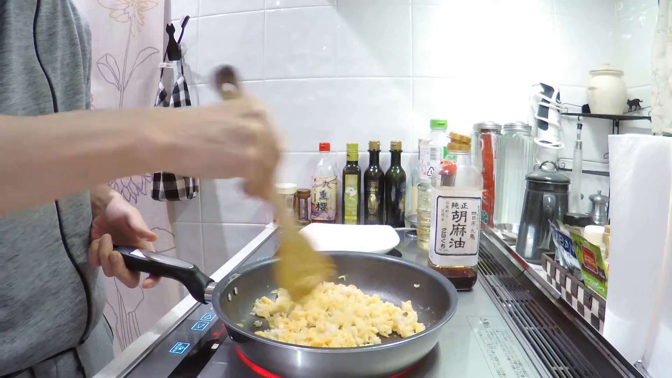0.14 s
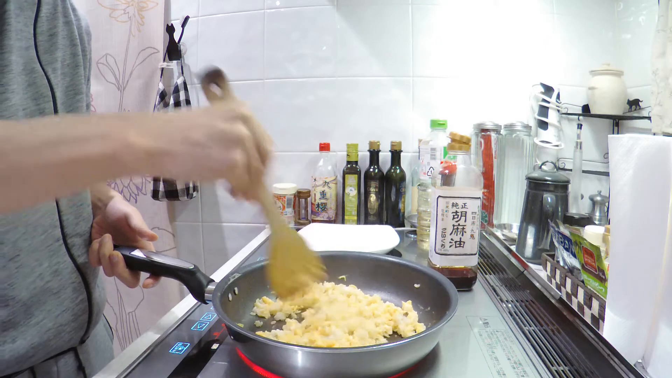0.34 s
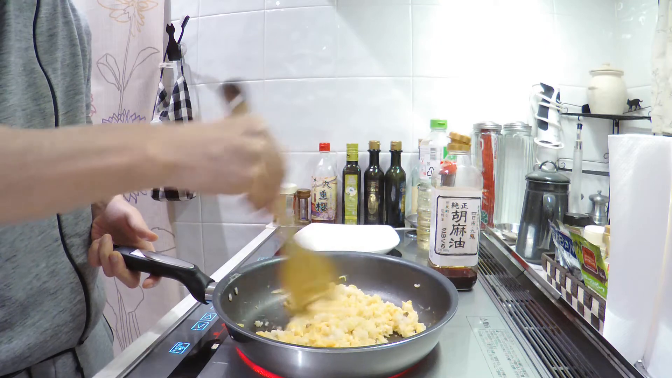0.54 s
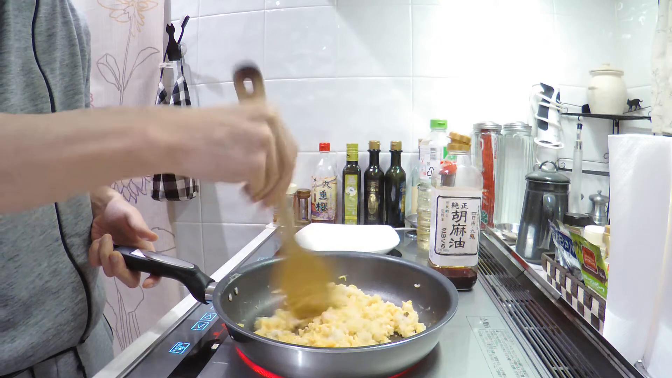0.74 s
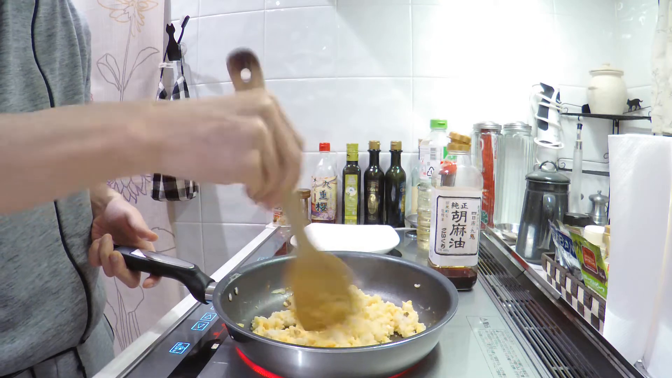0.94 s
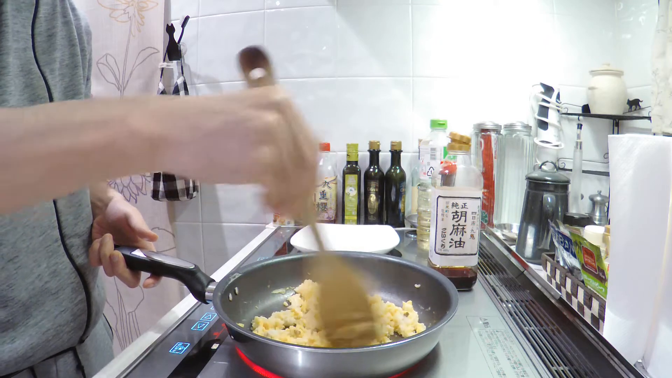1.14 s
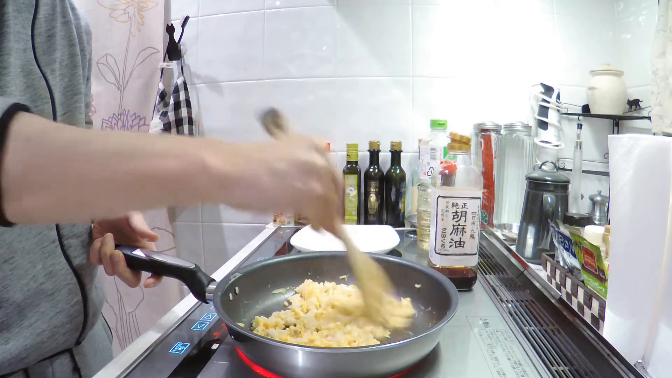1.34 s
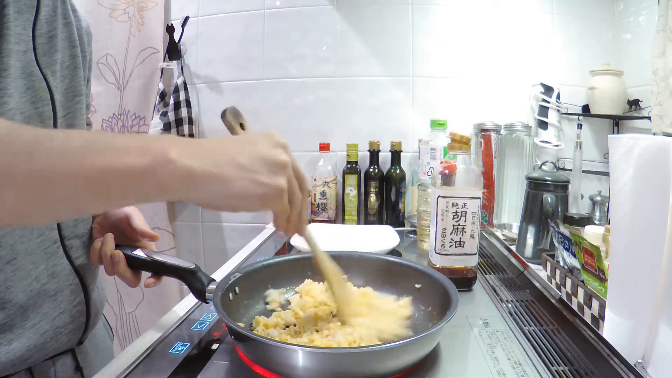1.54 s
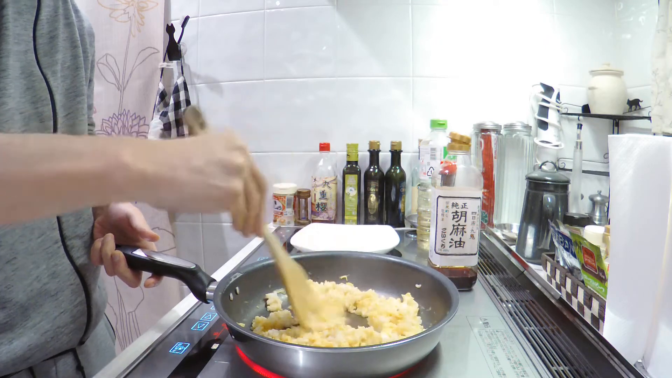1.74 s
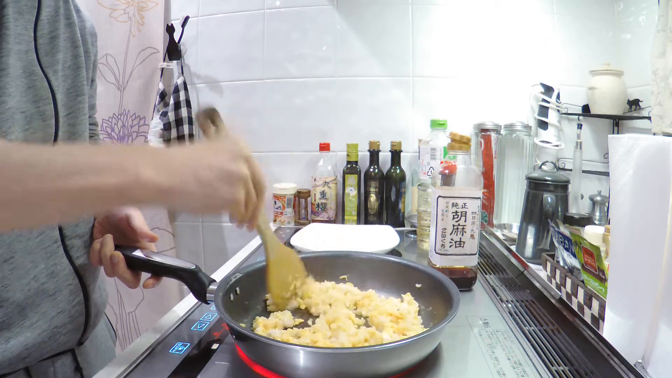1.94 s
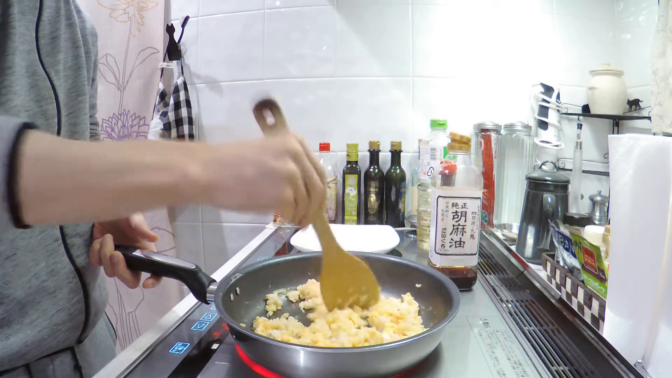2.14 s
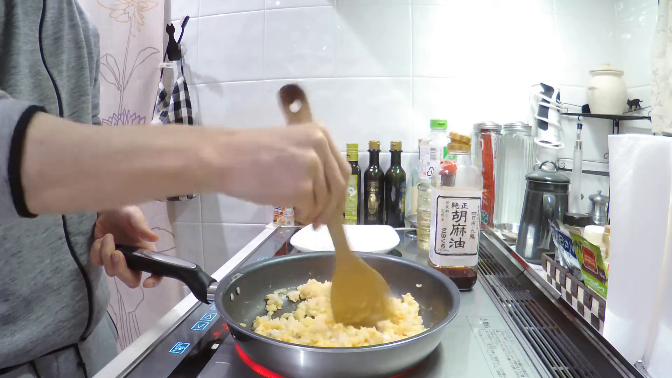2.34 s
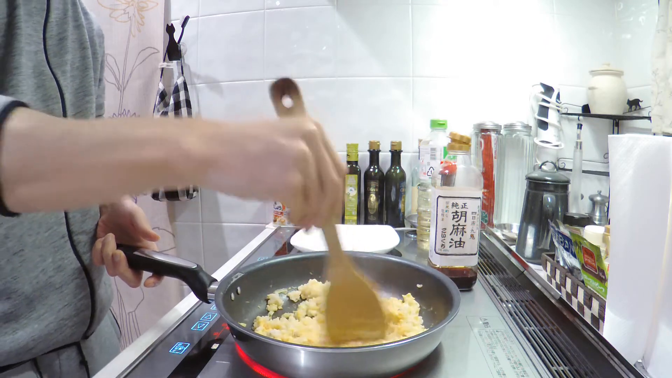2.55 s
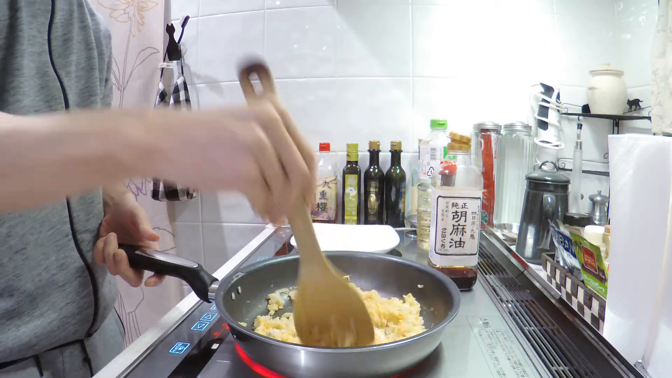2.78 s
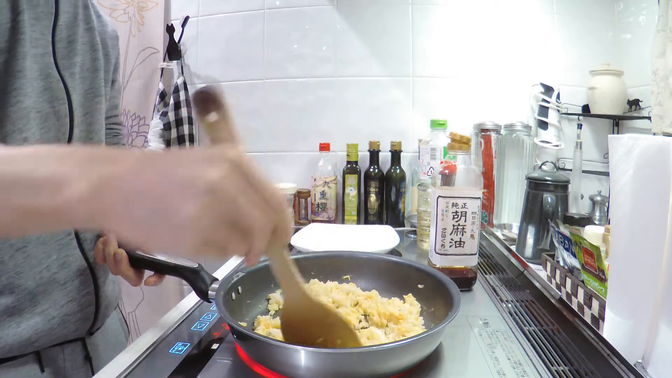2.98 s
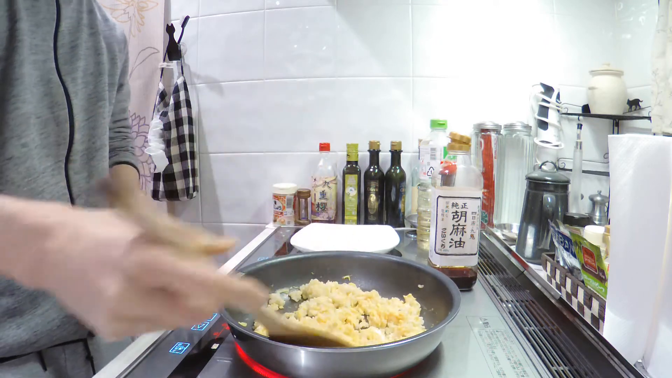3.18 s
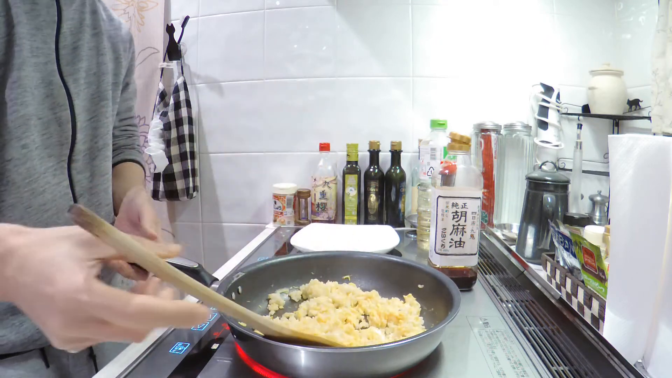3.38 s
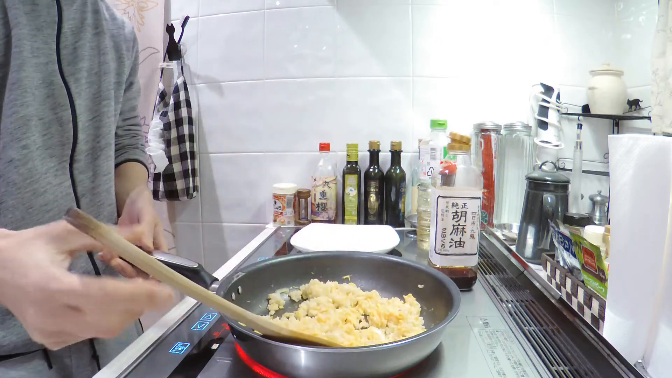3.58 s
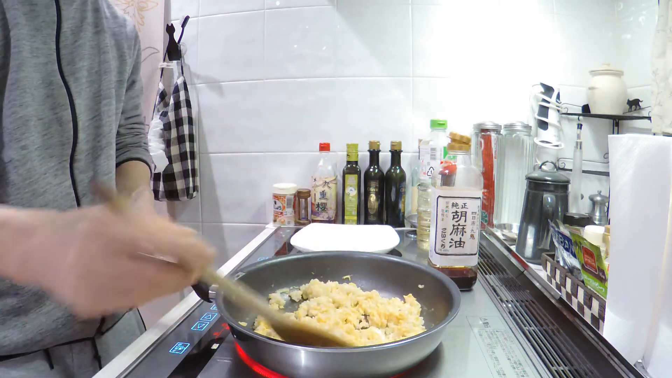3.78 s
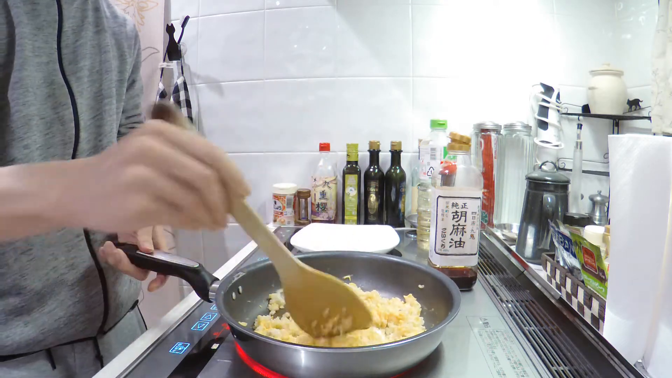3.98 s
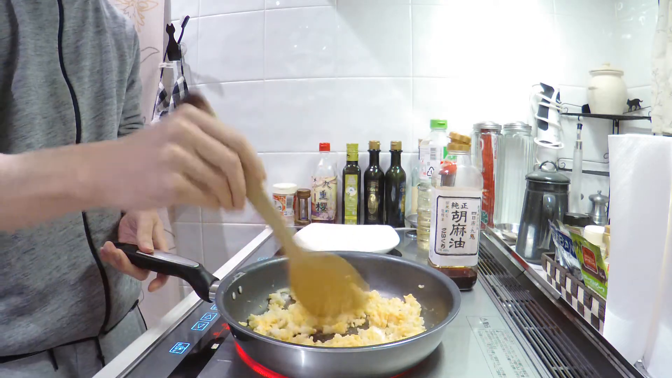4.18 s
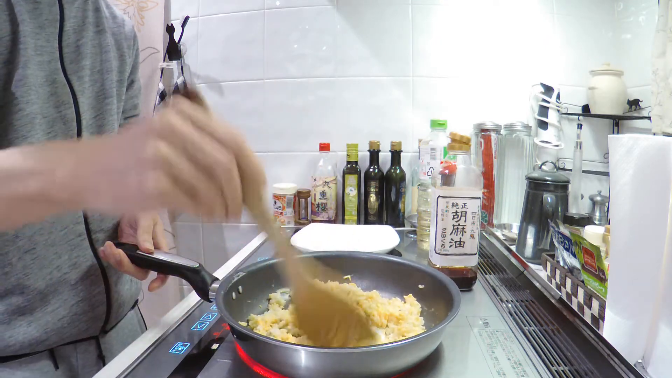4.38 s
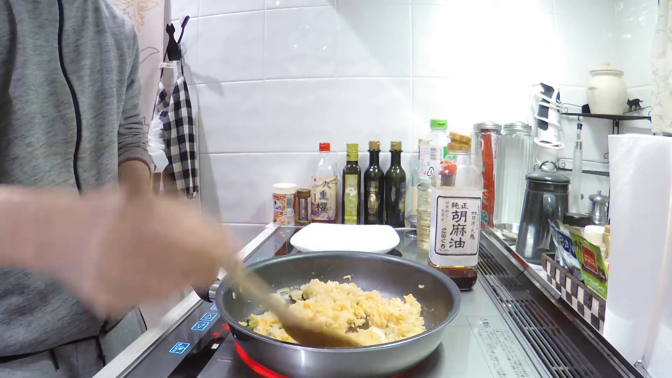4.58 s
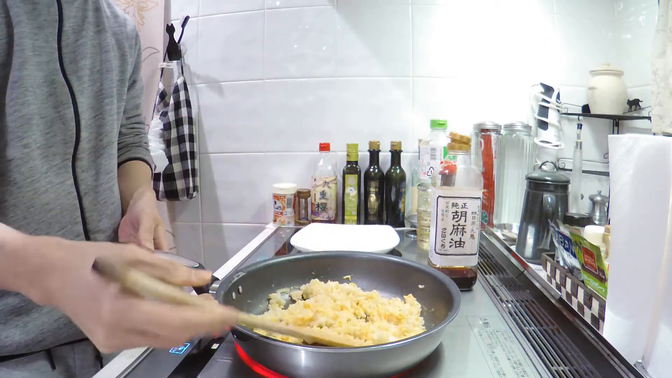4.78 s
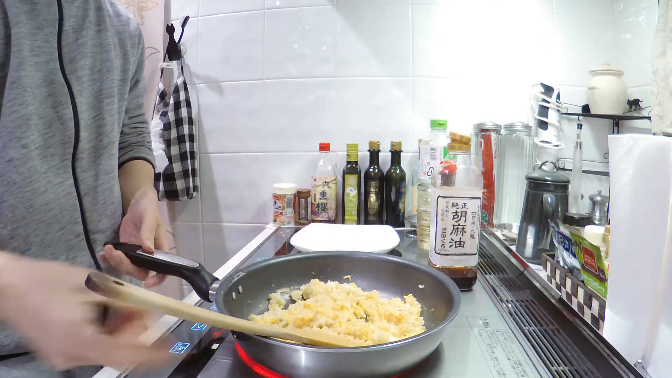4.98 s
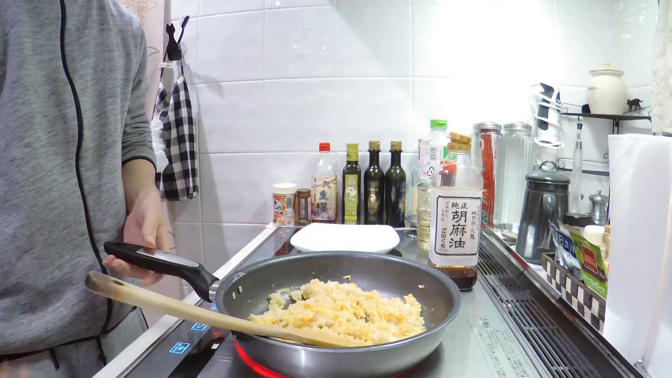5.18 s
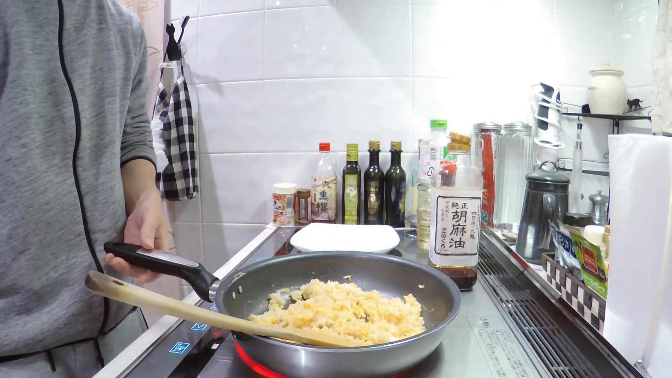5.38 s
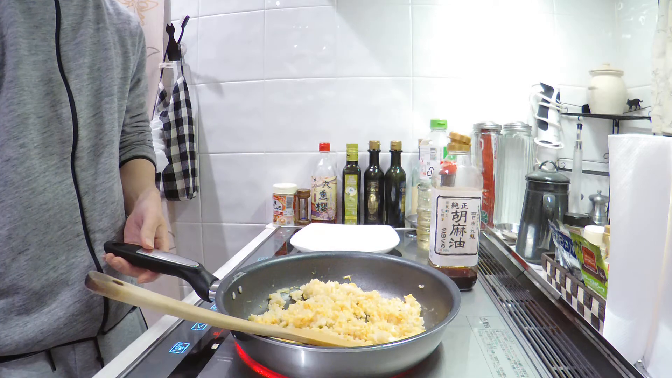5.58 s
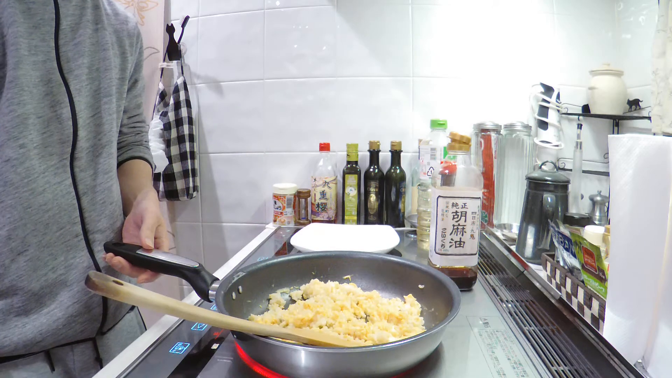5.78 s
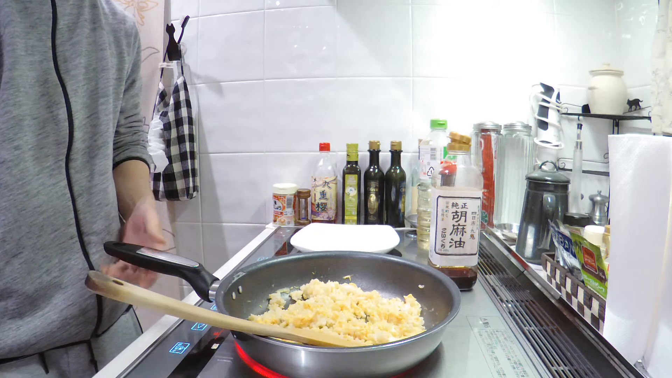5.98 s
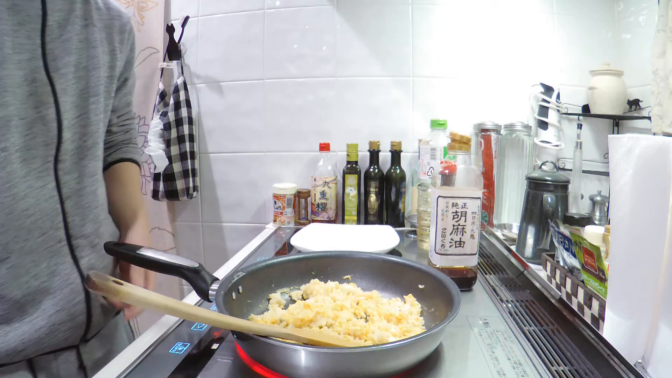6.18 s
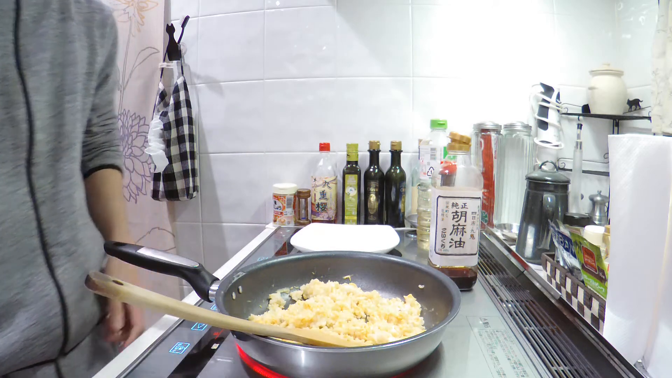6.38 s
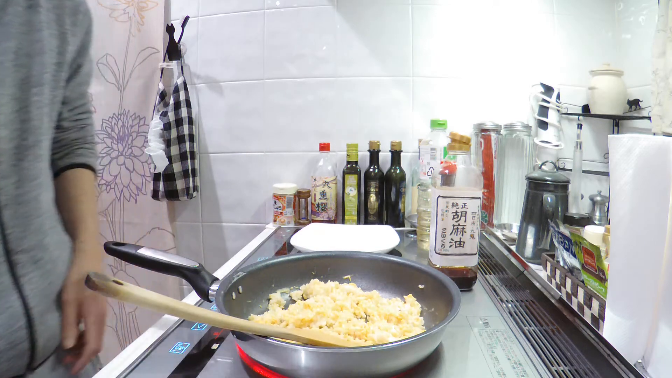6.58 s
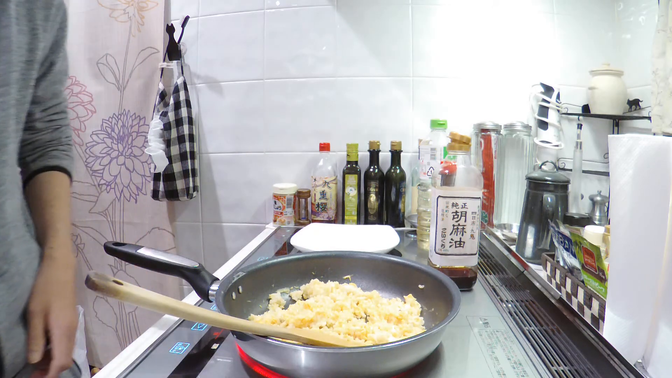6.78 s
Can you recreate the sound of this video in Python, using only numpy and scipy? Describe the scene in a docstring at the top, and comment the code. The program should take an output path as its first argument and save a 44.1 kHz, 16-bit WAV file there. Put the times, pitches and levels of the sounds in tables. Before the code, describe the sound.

A close stereo pickup in a small tiled kitchen. Throughout, a bright, fine oil fizz and lower wet rice crackle flutter and surge, over low room air and a faint high hob buzz. From 0.2 to 3.2 seconds a wooden spatula chops against a metal pan about every 0.2 seconds: dry woody knocks with short damped pan clonks, low counter thumps and quick wall reflections. Blows vary; those near 1.0, 1.95 and 2.35 are strong, others are soft taps. The chopping pauses after 3.2, with small spits around 3.5 and 3.8 and a faint scrape near 4.0. Two hard knocks land at 4.2 and 4.4, the first loudest. At 4.84 the handle clacks lightly on the rim with a brief metallic ting. Then the sizzle continues alone, slightly thinner, with scattered spits, tiny scrapes from 5.8 to 6.1, sharper spits near 6.6 and a barely audible tap at 6.8.

```python
"""A small tiled kitchen, where egg and rice fry in a metal pan on an induction hob.
A wooden spatula chops through the rice and hits the pan: noise makes its crack, fading sine waves make
the knock, the pan's ring and the counter's thump. The spatula is laid on the rim, and a deep sway follows the thumps.
Random clicks make the oil's fizz and the rice's crackle, which surge at knocks and falling clumps.
Noise bursts make spits and pops, runs of clicks make scrapes, sines a faint hob buzz, steady noise the air."""
import sys
import numpy as np
from scipy import signal
from scipy.fft import rfft, irfft, next_fast_len
from scipy.io import wavfile
from scipy.ndimage import uniform_filter1d

SR = 44100
rng = np.random.default_rng(int(sys.argv[2]) if len(sys.argv) > 2 else 0)


def put_to_file(sound):
    """Save the sound as 16-bit audio at rate SR, in the file named by the first command-line argument."""
    columns = np.atleast_2d(sound).T  # one column per channel
    safe = np.clip(columns, -1, 1)
    whole_steps = np.round(safe * 32767)
    wavfile.write(sys.argv[1], SR, whole_steps.astype(np.int16))


N = 301203
TIME = np.arange(N) / SR  # seconds

# The spatula meets the pan. Each row: start in seconds, blow level in dB, then three levels in dB relative
# to the blow (counter thump, wood crack, weight of the pan wall's ring), then the pitch of the blade's knock
# in Hz and the pitch favoured by the struck spot in Hz.
KNOCKS = [(0.221, -14, -14, -19, -4, 1097, 605), (0.433, -23.5, -15.5, -8, -23, 806, 505),
          (0.669, -25.5, -7, -25, -25, 1190, 610), (0.852, -19.5, -5.5, -19, -9, 1190, 592),
          (1.028, -8.5, -10.5, -21.5, -4.5, 1140, 479), (1.264, -23.5, -0.5, -18.5, -6.5, 740, 480),
          (1.521, -36.5, 3, -12, -20, 750, 442), (1.721, -17.5, -7.5, -19.5, 0.5, 1080, 610),
          (1.952, -7, -14.5, -18.5, 0, 1110, 363), (2.155, -16.5, -10.5, -25.5, -11.5, 876, 474),
          (2.34, -7, -14, -17, -4.5, 1197, 460), (2.538, -24.5, -3, -17, -5, 1150, 510),
          (2.72, -42, 13.5, -18, -19, 1120, 480), (2.926, -12, -4, -10, -2.5, 1127, 484),
          (3.204, -39.5, 2, -19, -4, 766, 482), (4.059, -45.5, 12.5, -23, -16, 746, 600),
          (4.22, -1, -16.5, -21, -7, 1190, 587), (4.416, -7.5, -10.5, -20, -6.5, 1130, 480),
          (4.837, -25, -1, -9.5, 3, 805, 482), (6.799, -55, 6.5, -10.5, -9, 1010, 500)]
# The counter and what stands on it. Each row: pitch in Hz, relative level in dB, time to fade by 60 dB in
# seconds, left-right phase difference in half turns.
COUNTER_MODES = [(62.6, -14.5, 0.21, 0.73), (103.5, -7.5, 0.35, 0.95), (132.2, -12, 0.12, 0.13),
                 (158, -7.5, 0.16, 0.97), (177.9, -3, 0.086, .1), (196.1, -4, 0.13, 0.46),
                 (237.4, -6.5, 0.059, 0.93), (250.3, -4.5, 0.097, 0.85)]
# The pan, damped by the rice. Each row: pitch in Hz, relative level in dB, time to fade by 60 dB in seconds.
PAN_MODES = [(297.2, -3, 0.098), (360, 3.5, 0.062), (408, -3, 0.1), (479.3, 5.8, 0.083), (548, -4.5, 0.11),
             (586, 5, 0.06), (651.5, 2, 0.091), (715, -5.5, 0.075), (777, -8.5, 0.125), (822, -2.5, 0.058),
             (938, -6.5, 0.078), (979, -0.5, 0.053), (1039, -9.5, 0.098), (1139, -3, 0.1),
             (1196, -8, 0.074), (1255, -11.5, 0.11), (1420, -15, 0.1), (1535, -2, 0.065), (1624, 3, 0.06),
             (1731, -2, 0.11), (1773, -5.5, 0.12), (1849, 4, 0.041)]
# Tone colour of the wood's dry crack. Each row: frequency in Hz, relative level in dB.
WOOD_COLOUR = [(300, -12.5), (900, 7), (1800, 9), (2600, 2), (3200, -1), (5000, -17), (8000, -19),
               (15000, -32.5)]
# The handle rings as it is laid on the rim. Each row: pitch in Hz, level in dB, time to fade by 60 dB in seconds.
RIM_MODES = [(1584, -31.5, 0.13), (1845, -29, 0.12), (2150, -39, 0.09), (2250, -32.5, 0.11),
             (3860, -28, 0.085), (4110, -31.5, 0.06)]
# Near walls and hob glass. Each row: delay in seconds, left gain, right gain (both before the echo level).
ECHO_PATHS = [(.0053, .42, 0.44), (.0069, .22, .38), (.0118, 0.196, .12), (.0205, .12, .16),
              (.0275, 0.3, 0.26)]
# Tone colour of the kitchen's reverberation. Each row: frequency in Hz, relative level in dB.
ROOM_COLOUR = [(80, -0.5), (300, -12.5), (600, -0.5), (1100, -6), (1750, -4.5), (2600, -11.5), (6000, -14),
               (15000, -4)]
# The larger oil spits. Each row: start in seconds, level in dB before tick, snap and puff are mixed.
SPITS = [(1.2672, -25), (3.456, -22.5), (3.5254, -30), (3.83, -30), (4.8498, -23.5), (4.8884, -31),
         (5.633, -31), (5.8138, -28), (5.8381, -31), (5.914, -29), (6.0534, -26.5), (6.162, -31),
         (6.4671, -31), (6.581, -23), (6.606, -27.5)]
# Tone colour of the oil's fizz. Each row: frequency in Hz, relative level in dB.
FIZZ_COLOUR = [(1000, -18.5), (2500, -12.5), (5000, -9), (6500, -7.5), (8400, -2.5), (10200, -5),
               (12500, -11.5), (16000, -18.5)]
# Tone colour of the wet rice's crackle. Each row: frequency in Hz, relative level in dB.
CRACKLE_COLOUR = [(300, -11.5), (700, 0.5), (1400, -11.5), (1900, -4), (2500, 0.5), (3500, 1), (5000, -1),
                  (7000, -6), (15000, -29)]
# Soft scrapes and shifts in the pan. Each row: start in seconds, length in seconds, centre in Hz, level in dB.
SCRAPES = [(3.793, 0.049, 2560, -50), (4.01, 0.13, 3000, -55), (5.781, 0.041, 885, -47.5),
           (5.835, 0.02, 3600, -41.5), (5.93, 0.043, 2600, -42.5), (6.025, 0.018, 2530, -42.5),
           (6.079, 0.016, 3200, -41)]
# Hob buzz. Each row: multiple of the magnetic pull's frequency, mean level in dB.
BUZZ = [(14, -71), (16, -76.5), (17, -87.5), (18, -65), (19, -73), (20, -70), (21, -68.5), (25, -68)]
# Tone colour of the kitchen's air. Each row: frequency in Hz, relative level in dB per Hz.
AIR_COLOUR = [(12, -16.5), (20, 9.5), (76, -11.5), (156, -6), (307, -17), (500, -11), (931, -32.5),
              (1210, -16), (1460, -36), (1640, -20), (1800, -47.5), (2340, -49), (3960, -120)]
# A clump of wet rice falls onto hot metal and the sizzle surges. Each row: time of the top in seconds,
# width in seconds, rise of the fizz in dB.
SURGES = [(0.212, 0.012, 7.5), (.51, 0.026, 5), (1.389, 0.046, 7), (2.35, 0.018, 6), (2.53, 0.038, 4.5),
          (2.96, 0.025, 5), (4.06, 0.049, 8), (4.63, 0.03, 6.5), (5.75, 0.033, 6), (6.176, 0.012, 6.5)]

RIM_S = 4.838  # when the handle is laid on the rim, seconds
# the dull clonk of the pan bottom grows more slowly than the blow, so hard blows sound brighter
CLONK_DB, CLONK_DB_PER_DB = -17.7, -0.51  # weight of the low modes relative to the blow, at a blow of 0 dB
RING_DB = -8.5  # the whole pan ring, on top of its weights
SPIT_HZ, SNAP_DB = 9300, -18  # pitch of a spit's tick; weight of its low snap before the mix
# fizz and crackle start at a level in dB and ease off, in dB per second, as the food dries
FIZZ_DB, FIZZ_DB_PER_S = -46.8, -0.25
CRACKLE_DB, CRACKLE_DB_PER_S = -53, -0.04
# each knock presses fresh rice onto the metal: the sizzle steps up and sinks back
PRESS_DB, PRESS_ATTACK_S, PRESS_T60_S = 2.3, 0.008, 1.3
PULL_HZ, SUNG_MULTIPLE = 120, 17
# the pan sings on one multiple while it is pressed down, and falls quiet as the hand eases
SING_DB, PRESSED_UNTIL_S, SING_DB_PER_S = -56.5, 2.3, -6.5
# each thump sets off a deep sway far down in the bass; hard and soft ones differ little, and a slight tremor is
# always there
SWAY_DB, SWAY_DB_PER_DB, TREMOR_DB = -32.3, 0.17, -62  # sway after a thump of 0 dB
SWAY_ATTACK_S, SWAY_T60_S = 0.054, 1.55
AIR_DB = -54.5  # level of the air's middle signal
TOP_HZ = 16100  # highest frequency let through


def knocks():
    """Wood strikes the pan through the rice: the blade's crack and knock, the pan's short ring, the counter's thump."""
    out, t = np.zeros((2, N)), TIME[:SR // 3]
    thump = counter_thump()
    for s, db, thump_db, crack_db, wall_db, blade_hz, spot_hz in KNOCKS:
        clonk_db = CLONK_DB + CLONK_DB_PER_DB * db
        # a sharp burst of noise with a faint longer tail
        grit_fade = fade(t, 0.044) + 0.057 * fade(t, 0.41)
        grit = spread(rng.standard_normal((2, len(t))), 0.36) * grit_fade
        crack = attack_unit(colour(grit, WOOD_COLOUR))
        blade = 0.85 * fade(t, 0.025) * np.sin(2 * np.pi * blade_hz * t)
        wood = echoes(blade + undb(crack_db) * crack, echo_db=-2.8, shift=0.06)
        ring = undb(RING_DB) * pan_ring(t, clonk_db, wall_db, spot_hz, spot_db=7, scatter_db=2.5, port_phase=0.4)
        # the blade and pan sound a moment after the thump starts
        add(out, s + 0.0008, undb(db) * (wood + ring))
        add(out, s, undb(db + thump_db) * thump)
    rim = sum(undb(db) * fade(t, t60) * np.sin(2 * np.pi * hz * t) for hz, db, t60 in RIM_MODES)
    add(out, RIM_S, rim)
    return out


def pan_ring(t, clonk_db, wall_db, spot_hz, spot_db, scatter_db, port_phase):
    """Each blow lands elsewhere, so weighs the modes anew; the bottom holds the low modes, the wall the high ones."""
    hz, db, t60 = np.transpose(PAN_MODES)[:, :, None]
    level_chance, phase_chance, side_chance = rng.standard_normal((3, len(PAN_MODES), 1))
    place_db = np.select([hz < 680, hz > 1350], [clonk_db, wall_db])
    # modes near the struck spot's pitch are favoured
    place_db = place_db + spot_db * np.exp(-((hz - spot_hz) / 45) ** 2)
    sides = np.array([1, -1])[:, None, None]
    phase = 1.33 * phase_chance + port_phase * side_chance * sides
    gain = undb(db + place_db + scatter_db * level_chance)
    modes = gain * fade(t, t60) * np.sin(2 * np.pi * hz * t + phase)
    return modes.sum(axis=1) * (1 - fade(t, 0.0051))  # quick soft start


def counter_thump():
    """The stiff worktop takes a moment to get going and shakes the two sides unlike."""
    t, sides = TIME[:SR // 2], np.array([[0.5], [-0.5]])
    modes = sum(undb(db) * fade(t, t60) * np.sin(2 * np.pi * hz * t + np.pi * lag * sides)
                for hz, db, t60, lag in COUNTER_MODES)
    return attack_unit(modes * (1 - fade(t, 0.069))) * undb(2.0 * sides)


def echoes(x, echo_db, shift):
    """The tiles and the hob glass throw a knock straight back; the path lengths vary from knock to knock."""
    out = x.copy()
    for delay, left, right in ECHO_PATHS:
        lag = int(delay * np.exp(shift * rng.standard_normal()) * SR)
        out[:, lag:] += undb(echo_db) * np.array([[left], [right]]) * x[:, :-lag]
    return out


def sizzle():
    """Bright fizz of the oil and a lower crackle of wet rice surge at knocks and falling clumps, in little flurries."""
    pressed_db = PRESS_DB * sum(kicked(s, PRESS_ATTACK_S, PRESS_T60_S) for s, *_ in KNOCKS)
    surge_db = pressed_db + sum(db * swell(top, width) for top, width, db in SURGES)
    flurry = flicker(45)
    fizz = unit(colour(bursts(14000, 3.2, width=1.07), FIZZ_COLOUR))
    fizz_db = FIZZ_DB + FIZZ_DB_PER_S * TIME + surge_db + 1.6 * flurry
    crackle = unit(colour(bursts(7000, 2.36, width=0.201), CRACKLE_COLOUR))
    crackle_db = CRACKLE_DB + CRACKLE_DB_PER_S * TIME + 0.7 * surge_db
    crackle_db = crackle_db + 1.28 * flurry + 1.53 * flicker(30)  # partly its own flicker
    return fizz * undb(fizz_db) + crackle * undb(crackle_db)


def spits():
    """Single drops of water explode in the oil: a sharp tick, a lower snap and a puff of steam."""
    out, t = np.zeros((2, N)), TIME[:SR // 10]
    tick_colour = [(700, -30), (3000, -18), (0.8 * SPIT_HZ, -6), (SPIT_HZ, 0), (2 * SPIT_HZ, -9)]
    snap_colour = [(800, -18), (2300, -9), (3800, 1), (6500, -15), (15000, -26)]
    for s, db in SPITS:
        tick = spread(rng.standard_normal((2, len(t))), 0.52) * fade(t, 0.0025)
        tick = attack_unit(colour(tick, tick_colour), size=128)
        snap = spread(rng.standard_normal((2, len(t))), 0.29) * fade(t, 0.058)
        snap = attack_unit(colour(snap, snap_colour), size=256)
        puff = unit(colour(rng.standard_normal((2, len(t))), FIZZ_COLOUR)) * fade(t, 0.066)
        add(out, s, undb(db) * (0.46 * tick + 0.44 * undb(SNAP_DB) * snap + 0.31 * puff))
    return out


def crackles(rate, db):
    """Now and then a grain of rice pops on the hot metal: a very short burst of noise."""
    t = TIME[:SR // 100]
    pop = rng.standard_normal((1, len(t))) * fade(t, 0.0018)
    pops = signal.fftconvolve(bursts(rate, 2.6, width=0.74), pop, axes=1)[:, :N]
    pop_colour = [(900, -17), (3000, -2.5), (6000, -3.5), (9500, 1), (16000, -5.5)]
    return undb(db) * unit(colour(pops, pop_colour))


def scrapes():
    """Wood and grains slide over the metal in a quick run of tiny slips."""
    out, slips = np.zeros((2, N)), bursts(3000, 4.3, width=0.65)
    for s, length, hz, db in SCRAPES:
        run = slips[:, int(s * SR):int((s + length) * SR)]
        rub = unit(colour(run, [(hz / 4, -16), (hz, 0), (hz * 4, -17)]))
        add(out, s, undb(db) * rub * np.hanning(rub.shape[-1]))
    return out


def hob():
    """The coil pulls on the pan bottom twice in each mains cycle; a few high multiples sing out."""
    turn = 2 * np.pi * PULL_HZ * TIME
    buzz = sum(undb(db + 1.5 * flicker(6)) * np.sin(multiple * turn) for multiple, db in BUZZ)
    sung = np.sin(SUNG_MULTIPLE * turn)
    sung_db = SING_DB + SING_DB_PER_S * np.maximum(TIME - PRESSED_UNTIL_S, 0)
    return np.sqrt(2) * (buzz + undb(sung_db + 1.6 * flicker(30)) * sung)


def sway(hz):
    """The chopping keeps a deep sway going unevenly, far down in the bass."""
    power = undb(TREMOR_DB) ** 2
    for s, db, thump_db, *_ in KNOCKS:
        kick_db = SWAY_DB + SWAY_DB_PER_DB * (db + thump_db)
        power = power + (undb(kick_db) * kicked(s, SWAY_ATTACK_S, SWAY_T60_S)) ** 2
    # the phase wanders, and differs between left and right
    turn = 2 * np.pi * hz * TIME + 1.4 * flicker(1.9) + np.array([[0.9], [-0.9]])
    return np.sqrt(2 * power) * np.sin(turn)


def air():
    """Low steady noise of the kitchen, wide in the bass."""
    mid, side = colour(rng.standard_normal((2, N)), AIR_COLOUR)
    side_colour = [(50, 5.5), (110, 9.0), (200, 3.5), (400, -4.5), (1000, -8.0)]
    return undb(AIR_DB) * spread([mid, colour(side, side_colour)], 0.69) / np.std(mid)


def kitchen(x, tail_db, t60):
    """The small room adds a short diffuse tail, made of fading noise."""
    t = TIME[:SR // 2]
    noise = spread(rng.standard_normal((2, len(t))), 0.55)
    tail = colour(noise, ROOM_COLOUR) * fade(t, t60) * (1 - fade(t, 0.034))
    tail = unit(tail) / np.sqrt(len(t))  # total energy of 1 per side, on average
    return x + undb(tail_db) * signal.fftconvolve(x, tail, axes=1)[:, :N]


def bursts(rate, size_db, width):
    """Tiny clicks at random moments and places from left to right, most small and a few large."""
    count = int(rate * N / SR)  # rate is clicks per second
    when, chance, where = rng.random((count, 3)).T
    loudness = size_db * np.minimum(-np.log(1 - chance), 6.5)
    # half of the clicks push and half pull, in random order
    size = undb(loudness) * np.where(np.arange(count) % 2, 1, -1)
    angle = np.pi / 4 + width * (2 * where - 1)
    sample = (when * N).astype(int)
    return unit(np.array([np.bincount(sample, size * gain, N) for gain in (np.cos(angle), np.sin(angle))]))


def flicker(rate):
    """Smooth random wander scaled to rms 1, with a new random target at the given rate per second."""
    k = int(SR / rate)
    steps = np.repeat(rng.standard_normal(N // k + 1), k)
    return unit(uniform_filter1d(steps, k)[:N])


def swell(top, width):
    """A smooth rise and fall, 1 at its top."""
    return np.exp(-((TIME - top) / width) ** 2)


def kicked(start, attack, t60):
    """A quick rise at a time, then a decay."""
    age = np.maximum(TIME - start, 0)
    return (1 - np.exp(-age / attack)) * fade(age, t60)


def fade(t, t60):
    """Exponential decay that falls by 60 dB in t60 seconds."""
    return np.exp(-np.log(1000) * t / t60)


def colour(x, points):
    """Filter that follows a (Hz, dB) curve and never sounds ahead of its input."""
    size = next_fast_len(2 * x.shape[-1], True)
    size += size % 2
    hz, db = np.transpose(points)
    bin_hz = np.fft.rfftfreq(size, 1 / SR)
    log_gain = np.log(undb(np.interp(np.log(bin_hz + 1), np.log(hz), db)))
    # folding the cepstrum onto positive times gives the matching minimum phase
    cepstrum = irfft(log_gain)
    cepstrum[1:size // 2] *= 2
    cepstrum[size // 2 + 1:] = 0
    response = np.exp(rfft(cepstrum))
    return irfft(rfft(x, size) * response)[..., :x.shape[-1]]


def spread(pair, width):
    """Two unrelated signals as middle and side."""
    return pair[0] + width * pair[1] * np.array([[1], [-1]])


def undb(db):
    """Decibels to gain."""
    return 10 ** (np.asarray(db) / 20)


def unit(x):
    """Scale to rms 1."""
    return x / np.sqrt(np.mean(x ** 2))


def attack_unit(x, size=1024):
    """Scale so that the first samples, as many as size, have rms 1."""
    return x / np.sqrt(np.mean(x[..., :size] ** 2))


def add(out, start, sound):
    """Mix a sound in at a time in seconds."""
    i = max(int(start * SR), 0)
    out[:, i:i + sound.shape[-1]] += sound[..., :N - i]


def scene():
    """Blows and frying sound in the room; the pan stands a little to the right."""
    blows = kitchen(knocks(), tail_db=-13, t60=0.28)
    food = sizzle() + spits() + crackles(rate=30, db=-57) + scrapes()
    frying = kitchen(food, tail_db=-8, t60=0.2)
    balance = undb(np.array([[-0.6], [0.6]]))
    return (blows + frying + hob()) * balance + air() + sway(hz=22.2)


def record(dry):
    """Peaks beyond full scale are clipped and the top is cut."""
    clipped = np.clip(dry, -1, 1)
    low_pass = signal.ellip(10, 0.1, 80, TOP_HZ, fs=SR, output="sos")
    return signal.sosfilt(low_pass, clipped)


dry = scene()
out = record(dry)
put_to_file(out)
```